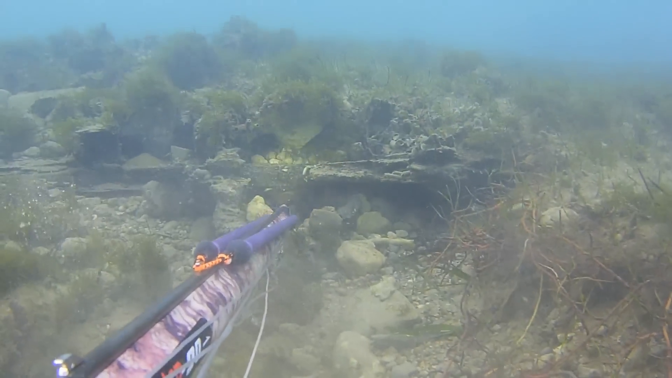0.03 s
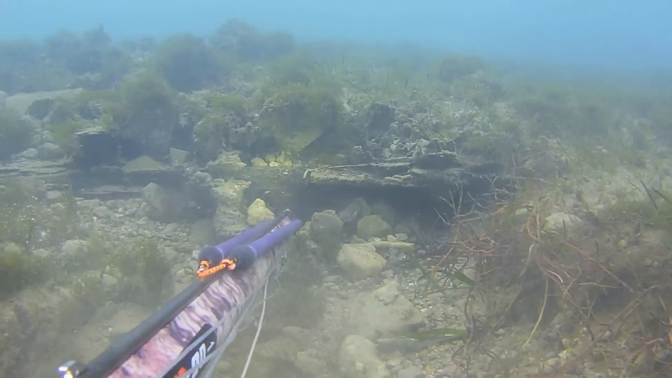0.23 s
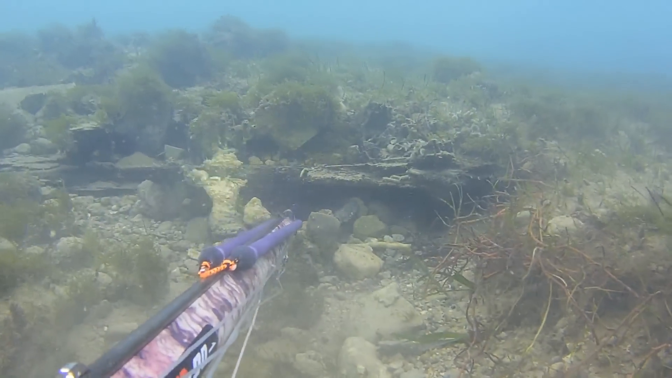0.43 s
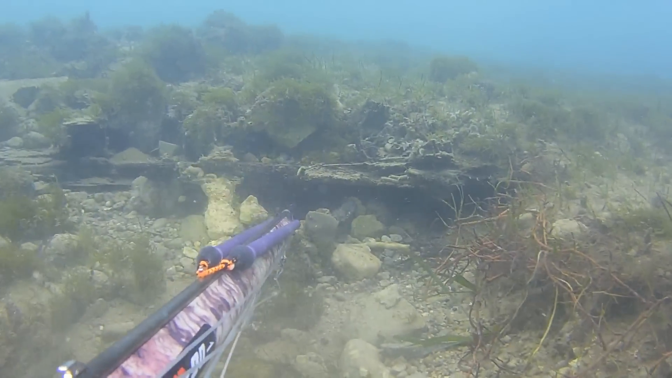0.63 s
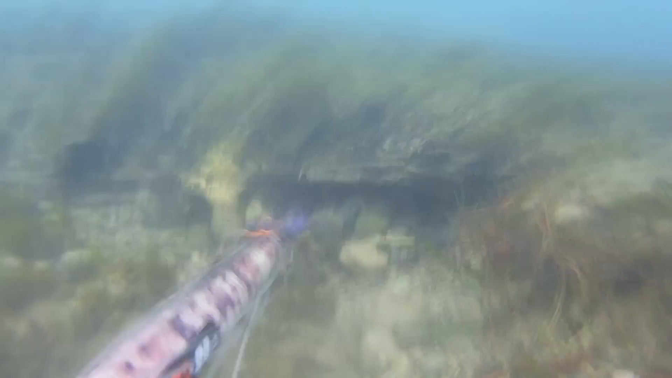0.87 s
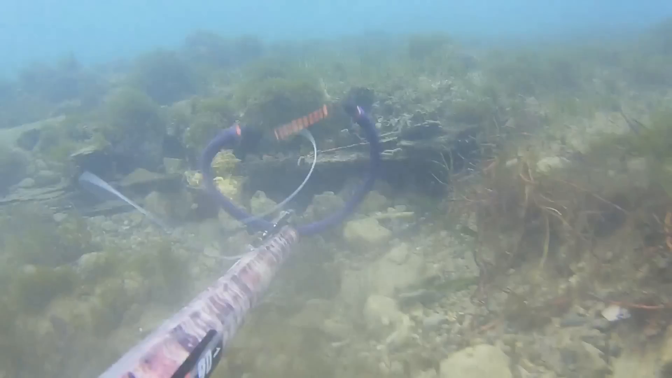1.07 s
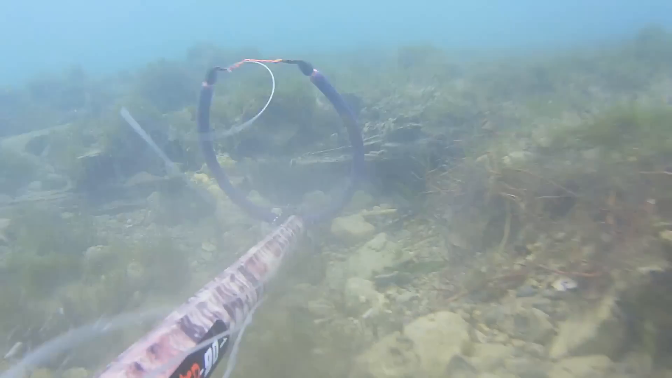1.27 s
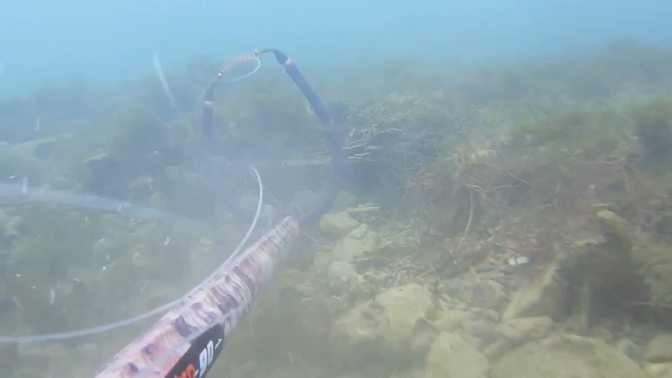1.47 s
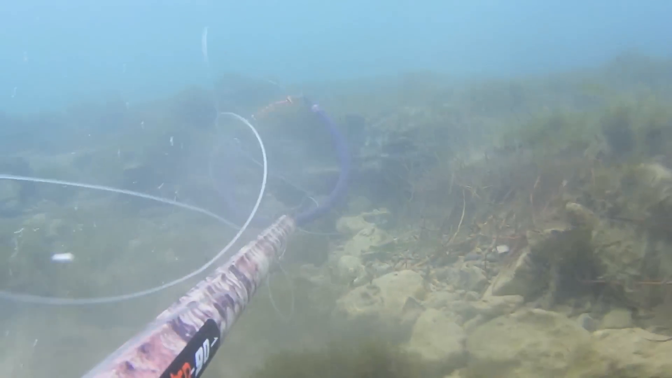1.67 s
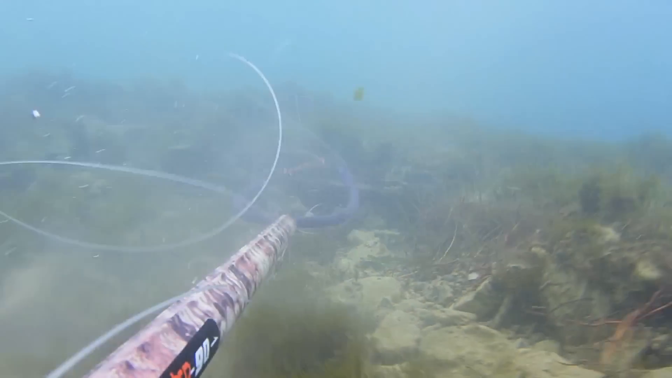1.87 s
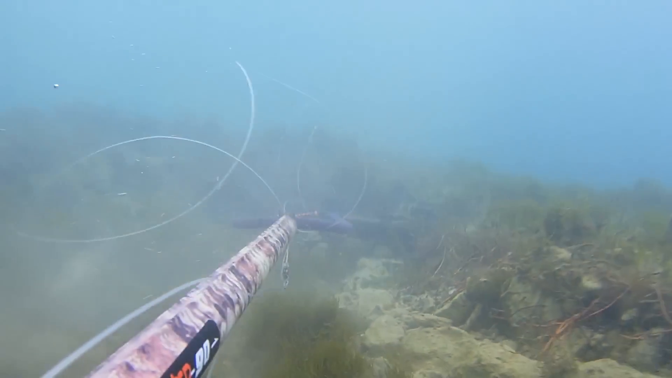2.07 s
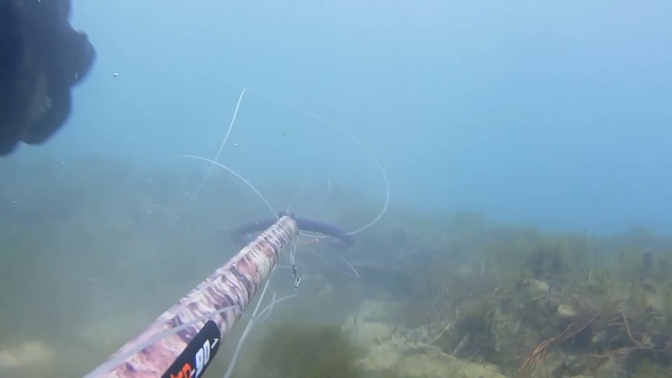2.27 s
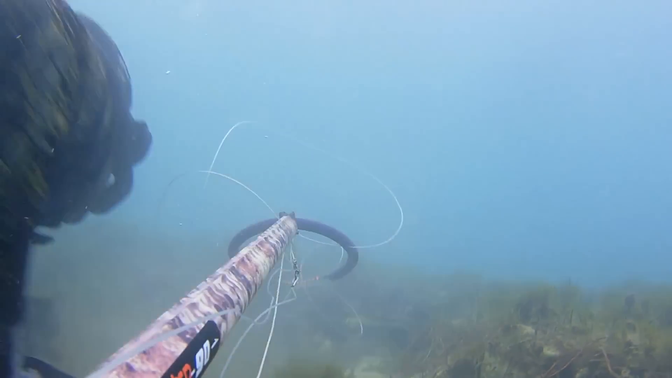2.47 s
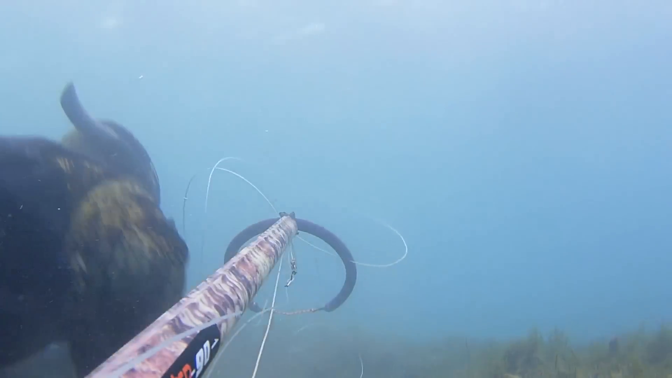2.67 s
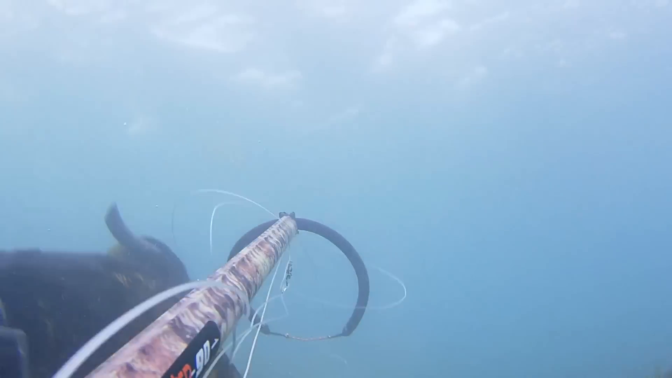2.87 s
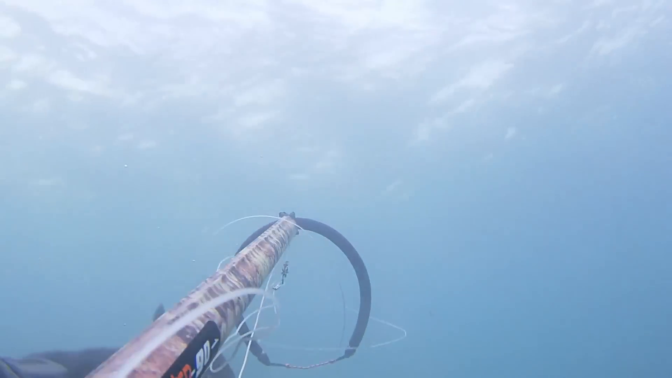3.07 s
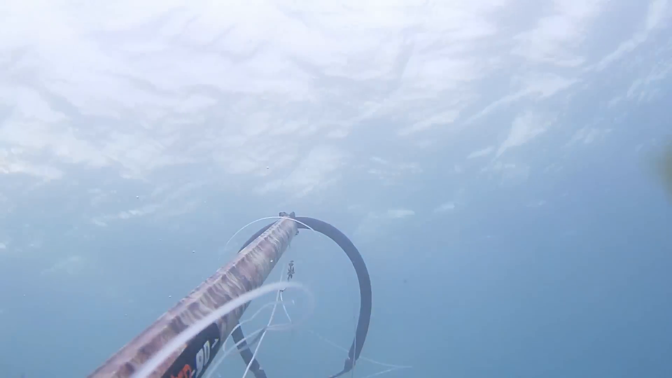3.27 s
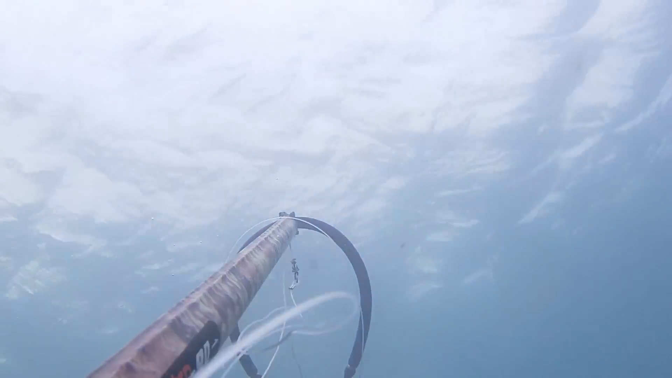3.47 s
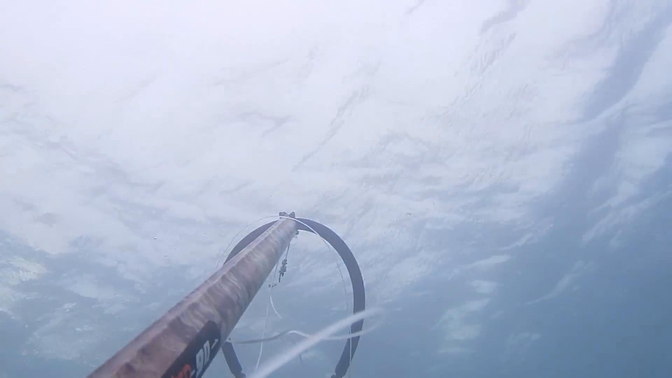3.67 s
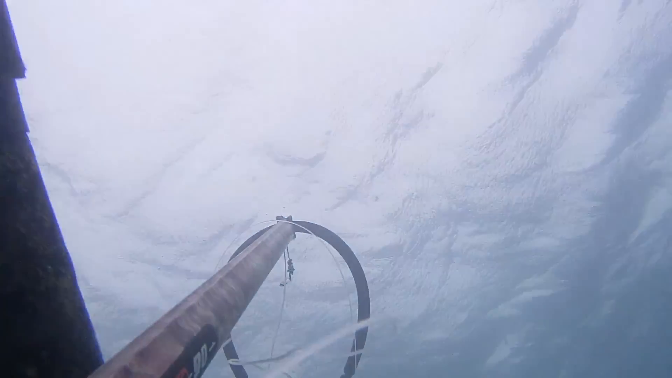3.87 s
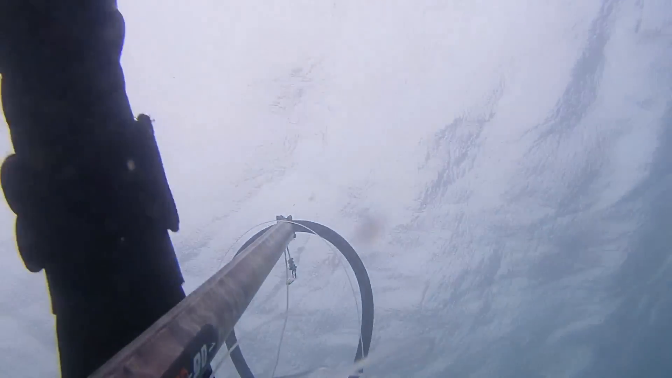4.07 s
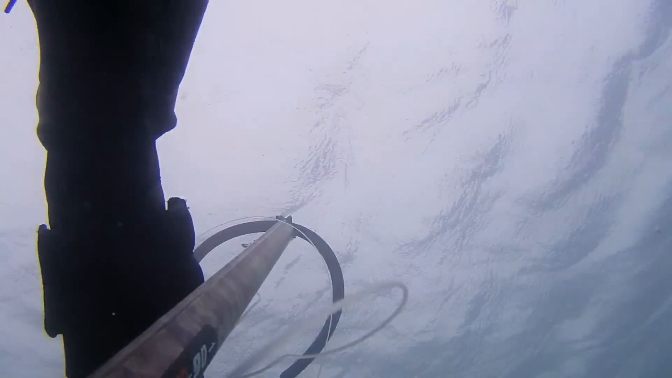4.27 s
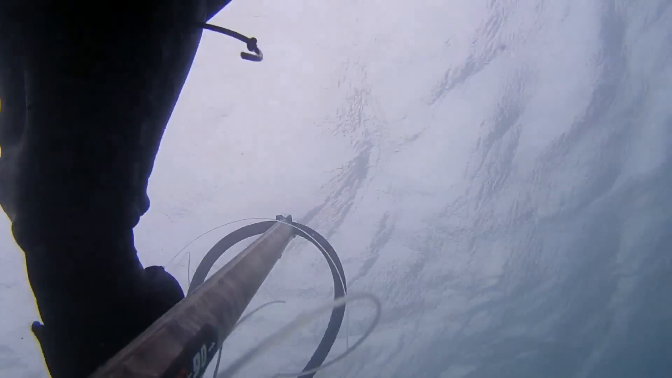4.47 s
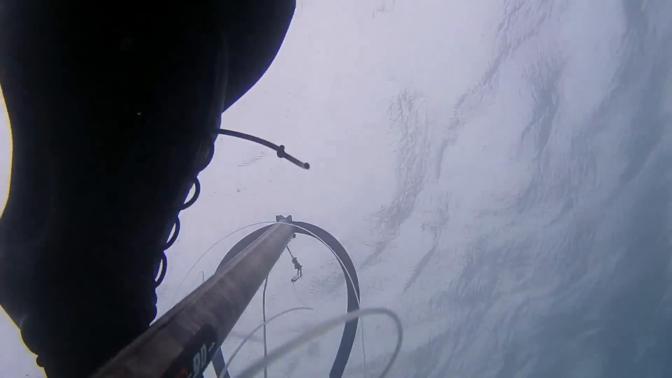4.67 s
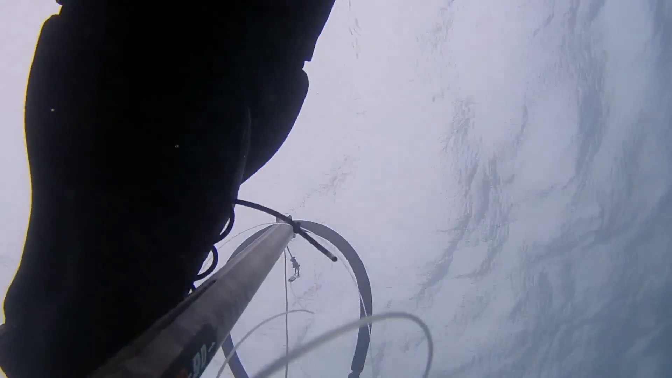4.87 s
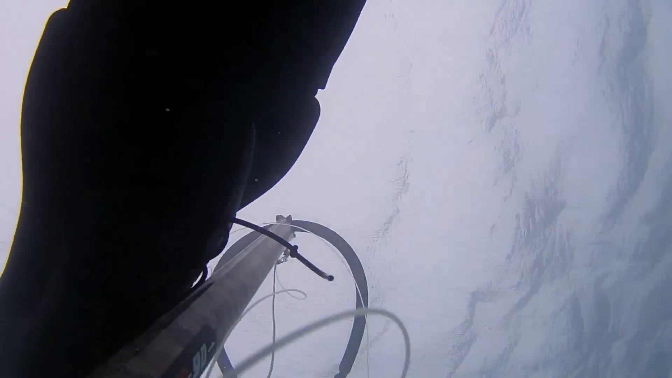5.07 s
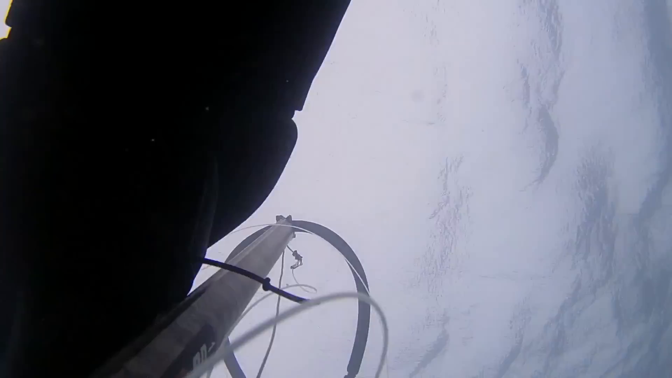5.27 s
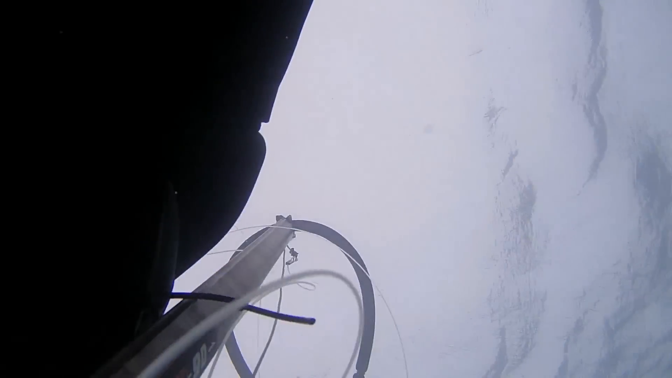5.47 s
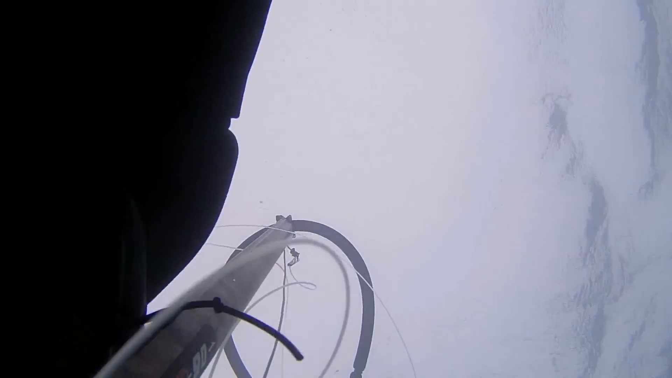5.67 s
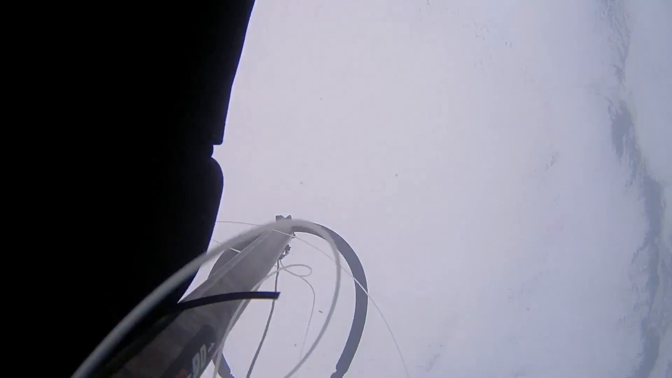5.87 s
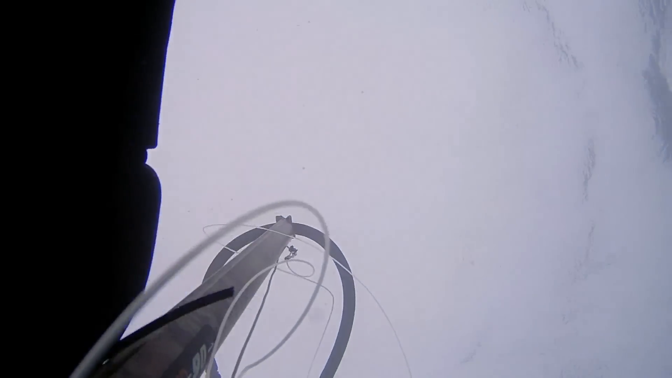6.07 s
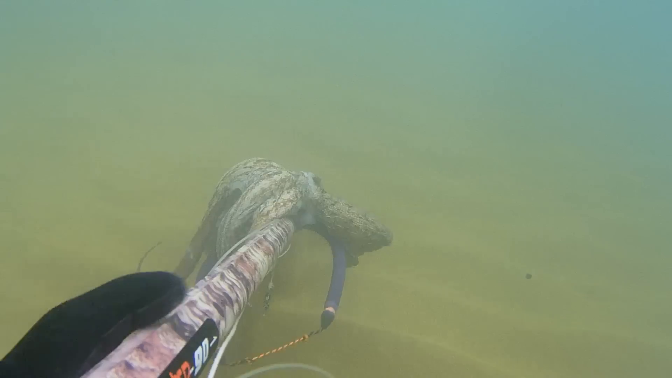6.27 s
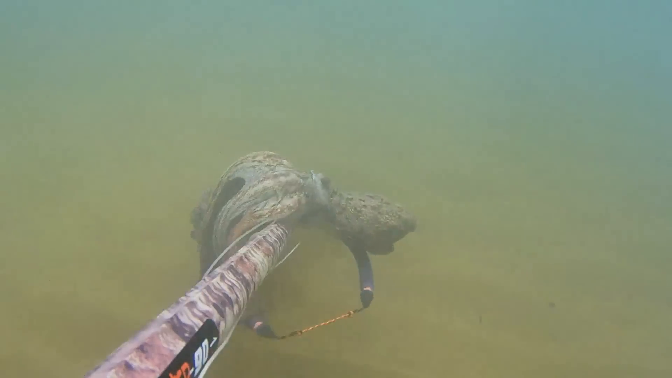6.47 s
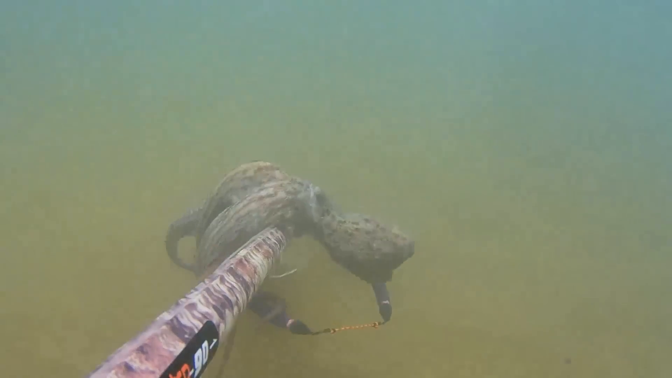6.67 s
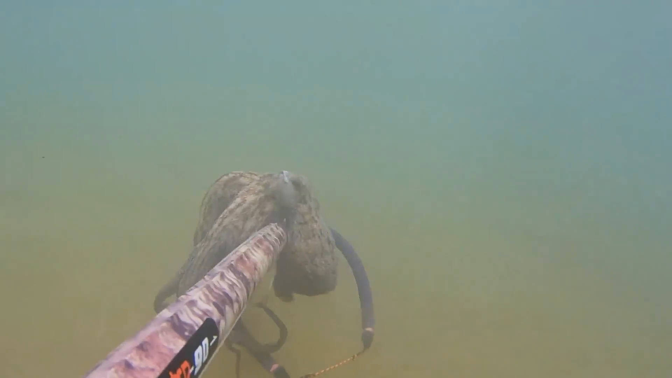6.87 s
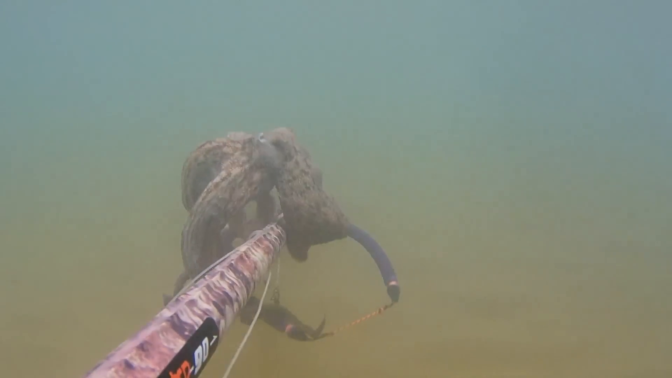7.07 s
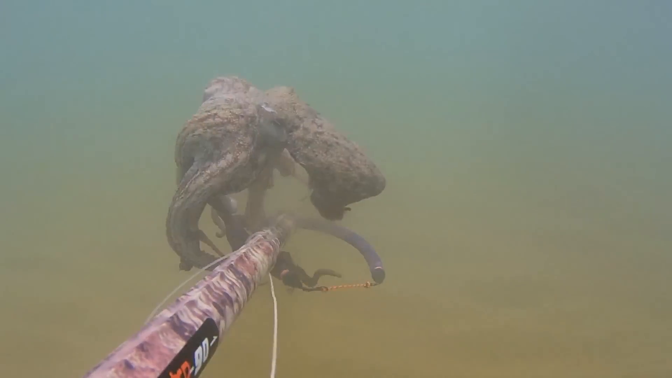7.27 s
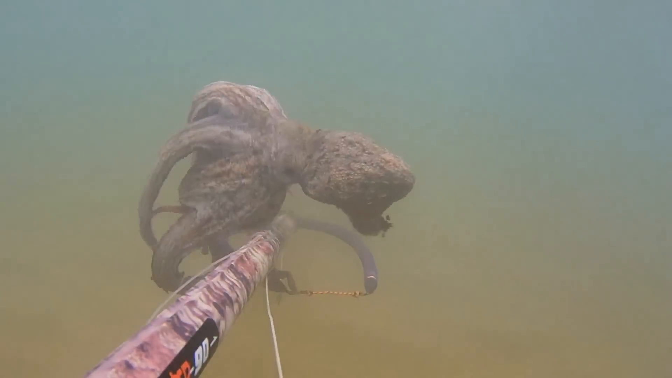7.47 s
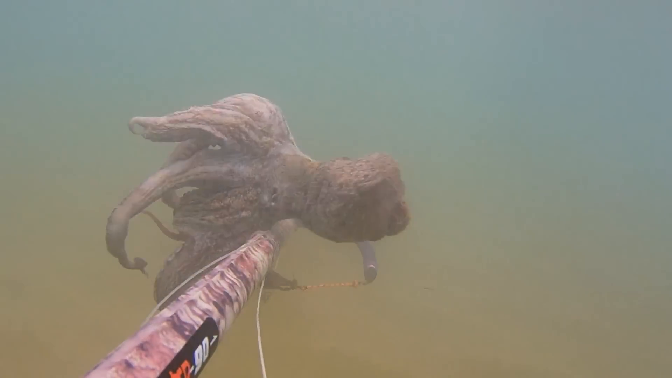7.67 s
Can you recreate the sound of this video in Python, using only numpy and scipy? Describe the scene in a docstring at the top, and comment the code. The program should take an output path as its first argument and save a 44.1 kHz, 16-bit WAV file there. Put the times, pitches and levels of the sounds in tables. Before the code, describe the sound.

Muffled shallow-water wash runs throughout, low and steady, with very faint sparse crackle, heard close through a camera housing on a speargun. At 0.2-0.3 s, faint snaps and a light rub. At 0.85 s the shot slams twice in quick succession, loud, hard and distorted, chattering along the rail until about 0.97 s with a short steel ring. Small knocks and line rubs follow, a firmer knock at 1.2 and a thin rising squeak around 1.3-1.4. Soft slaps at 1.6-1.8, rubbing fading by 2.7. A bouncing hollow knock at 3.75; a low boom at 4.15, a bubble ping at 4.29 and a strong knock at 4.32. Near quiet, then a resonant knock with booming at 5.8 and tiny bubbles. Sound drops out briefly at 6.25; soft rubs, a low thud at 6.44, a faint rubber groan at 6.85-7.05, and a last dull thump at 7.2.

```python
"""Under water, heard from a microphone in a camera housing fixed to a rubber-band speargun: first faint snaps and a rub.
Then the shot slams and chatters along the rail, overloading the input, and the shaft rings; the line squeaks out.
Slaps, knocks and rubs follow on the gun; like the slams they ring one bank of body modes, with damped notes added.
Later a few bubbles ping, the sound drops out for an instant, and a band groans at the end.
Behind it all lie the dull wash of shallow water, shaped noise, and a faint far crackle of random ticks."""
import sys
import numpy as np
from scipy import signal
from scipy.fft import rfft, irfft
from scipy.io import wavfile
from scipy.ndimage import uniform_filter1d

SR = 44100
rng = np.random.default_rng(int(sys.argv[2]) if len(sys.argv) > 2 else 0)


def bounce(signal):
    """Save signal as a 16-bit WAV file at the path given by the first command-line argument."""
    frames = np.transpose(np.atleast_2d(signal))
    limited = np.clip(frames, -1, 1)
    pcm = np.round(limited * 32767).astype(np.int16)
    wavfile.write(sys.argv[1], SR, pcm)


N = 340893  # samples in the scene


def from_db(db):
    """Decibels to amplitude gain."""
    return 10 ** (np.asarray(db) / 20)


def rms_one(x):
    """Scale to unit rms."""
    return x / np.sqrt(np.mean(x ** 2) + 1e-20)


def seconds(length_s):
    """A time axis from zero."""
    return np.arange(int(length_s * SR)) / SR


def add(out, start_s, sound):
    """Mix a sound in at a time, cut off at the end of the scene."""
    i = int(max(start_s, 0) * SR)
    out[i:i + len(sound)] += sound[:N - i]


def ring(force, hz, t60_s):
    """A two-pole resonator: a unit click sets a decaying sine of height about 1 ringing."""
    radius = from_db(-60 / (t60_s * SR))
    angle = 2 * np.pi * hz / SR
    # the tiny offset keeps the filter from running on vanishing numbers
    return signal.lfilter([0, np.sin(angle)], [1, -2 * radius * np.cos(angle), radius ** 2], force + 1e-18)


def asperities(size, per_s, spread_db):
    """Tiny random catches between two rough surfaces, of either sign and varied strength."""
    catches = rng.random(size) < per_s / SR
    strength = rng.standard_normal(size)
    return catches * strength * from_db(spread_db * rng.standard_normal(size))


# modes of barrel and housing: pitch_hz [Hz], level_db [dB, relative within a register], t60_s [s]
BODY_MODES = [(40.4, -5, 0.54), (60, -3, .25), (90, -4.5, .15), (130.4, 3, .11), (180, -2.5, .055),
              (200, -7, 0.03), (322.3, -1, 0.099), (396, -6.5, .025), (490.5, -12, 0.04),
              (543, -4.5, 0.033), (690, 5, .032), (689, -17, .22), (788, -2, .055), (1000, -8.5, 0.045),
              (1124, -8, .016), (1331.6, 2, 0.034), (1486.5, 3, 0.03), (1622, -2, 0.028), (1745, -4, 0.039),
              (2021, 3.5, 0.017), (2315, -1, 0.063), (2500, -3, 0.094), (2844, -8.5, .018),
              (3183, -9, 0.022), (3630, -4.5, 0.024), (4440, 0.5, 0.0051), (5270, -4.5, .012),
              (6000, -5, .014), (7700, -7, .005), (10400, -8, 0.0079), (13315, -17.5, .003)]
# bounds of the five registers, thump, hollow, ring, clack and tick: edge_hz [Hz]
REGISTER_EDGES_HZ = [25, 450, 1080, 1880, 3400, 15000]
MODE_SCATTER = .018  # pitch shift, standard deviation as a share of the pitch


def gun(force, register_db, span_s):
    """The body rings; the place of contact sets each register's level (rms, were it all spent within span_s)."""
    out = np.zeros(len(force))
    for low, high, level_db in zip(REGISTER_EDGES_HZ, REGISTER_EDGES_HZ[1:], register_db):
        band = signal.butter(2, [low, high], "band", fs=SR, output="sos")
        drive = signal.sosfilt(band, force + 1e-18)
        sound = 0
        for hz, mode_db, t60_s in BODY_MODES:
            if low < hz <= high:
                # the point of contact sets a mode's sign; grip and water load shift its pitch a little
                pitch_hz = hz * (1 + MODE_SCATTER * rng.standard_normal())
                sign = rng.choice([-1, 1])
                sound = sound + sign * from_db(mode_db) * rms_one(ring(drive, pitch_hz, t60_s))
        out += from_db(level_db) * rms_one(sound)
    return out * np.sqrt(span_s * SR / len(force))


def blows(rows, rattle_db, rattle_s):
    """Each blow is a quick crunch of contacts with a weaker, dying rattle."""
    out, t = np.zeros(N), seconds(.5)
    for start_s, contact_s, register_db in rows:
        crunch = t / contact_s * np.exp(1 - t / contact_s)
        rattle = from_db(rattle_db) * np.exp(-t / rattle_s)
        force = (crunch + rattle) * asperities(len(t), per_s=20000, spread_db=1.5)
        add(out, start_s, gun(force, register_db, span_s=.01))
    return out


def pings(table, swell_s):
    """Single damped sines that take a moment to swell."""
    out, t = np.zeros(N), seconds(.3)
    for start_s, pitch_hz, level_db, t60_s in table:
        decay = from_db(level_db - 60 * t / t60_s)
        swell = 1 - np.exp(-t / swell_s)
        add(out, start_s, decay * swell * np.sin(2 * np.pi * pitch_hz * t))
    return out


def squeak(curve, waver):
    """Stick-slip: a thin tone follows a curve; waver is its rms pitch unsteadiness as a share of the pitch."""
    point_s, pitch_hz, level_db = np.transpose(curve)
    t = np.arange(N) / SR
    unsteady = rms_one(uniform_filter1d(rng.standard_normal(N), size=60))
    pitch = np.interp(t, point_s, pitch_hz) * (1 + waver * unsteady)
    sounding = (t > point_s[0]) & (t < point_s[-1])
    tone = np.sin(2 * np.pi * np.cumsum(pitch) / SR)
    return sounding * from_db(np.interp(t, point_s, level_db)) * tone


# trigger release, band and shaft slam against the rail:
# start_s [s], level_db [dB], weight_db [dB, added to the thump], rebounds [count]
SHOT_SLAMS = [(0.851, 1.5, 4.5, 1), (0.8744, 5.5, -4, 4), (0.9219, -7, -1, 1), (0.936, -4, 1, 1)]
# how a slam feeds the registers: thump_db, hollow_db, ring_db, clack_db, tick_db [dB]
SHOT_COLOUR = [-13, -0.5, 1.5, -11.5, -23]
CHATTER_S, CHATTER_LOSS_DB, CHATTER_CONTACT_S = .0085, 5, .0017  # spacing, loss per touch, contact


def shot_slams():
    """After each slam the shaft chatters on the rail, weaker with every touch."""
    rows = []
    for start_s, level_db, weight_db, rebounds in SHOT_SLAMS:
        tilt_db = np.array([weight_db, 0, 0, 0, 0]) + SHOT_COLOUR
        for k in range(int(round(rebounds)) + 1):
            rows.append((start_s + k * CHATTER_S, CHATTER_CONTACT_S, level_db - k * CHATTER_LOSS_DB + tilt_db))
    return blows(rows, rattle_db=-48.5, rattle_s=0.005)


# notes of the freed steel shaft: start_s [s], pitch_hz [Hz], level_db [dB], t60_s [s]
SHAFT_NOTES = [(.915, 2930, -17, 0.18), (.925, 2422, -21, 0.16)]


def shaft_ring():
    """The freed steel shaft rings in damped tones."""
    return pings(SHAFT_NOTES, swell_s=0.0036)


# curve of the line's squeak: point_s [s], pitch_hz [Hz], level_db [dB]
LINE_SQUEAK = [(1.29, 2300, -70), (1.315, 2130, -56), (1.345, 2600, -63), (1.36, 2560, -50),
               (1.38, 3100, -58), (1.395, 3900, -64.5)]


def line_squeak():
    """The line sticks and slips as it runs out, squeaking at an unsteady pitch."""
    return squeak(LINE_SQUEAK, waver=0.035)


# knocks of hard gear on the gun, and a few faint sharp snaps and ticks: start_s [s], level_db [dB],
# weight_db [dB], hollowness_db [dB], hardness_db [dB], bounces [count]
KNOCKS_AND_SNAPS = [(.2184, -61, 4, -4, 20, 0), (0.3116, -67, 0, 0, 24.5, 0), (.827, -45.5, -7, -4, 1, 0),
                    (0.9533, -28, 4, -4, 4, 0), (0.9626, -23.5, -2.5, -1, -1, 0),
                    (0.9828, -24, -6, -7, -4, 0), (1.0144, -26.5, -19, -8.5, -1, 0),
                    (1.0215, -23.5, -5, -5, 5.5, 0), (1.0445, -36, -16, -6, 7, 0),
                    (1.078, -37.5, 3, -8, 3.5, 0), (1.2189, -16.5, -14, 0, -7.5, 0),
                    (1.262, -39.5, -13, -4.5, 7, 0), (2.7128, -40.5, -8, -4, -1.5, 0),
                    (3.7294, -33, 3.5, 1, 0.5, 0), (3.7715, -17.5, -5.5, -1.5, -2.5, 0),
                    (3.7778, -14, -4.5, 2, -2.5, 3), (4.1928, -35.5, -10, -6, 13.5, 0),
                    (4.3223, -12.5, 1.5, 2.5, 0.5, 2), (5.8236, -25.5, -8.5, 2.5, 4.5, 1),
                    (5.865, -42, -0.5, 2, 12, 0), (5.875, -32, -12.5, 1.5, 3, 0), (6.572, -61, 0, 4, 22, 0)]
# how a knock feeds the registers: thump_db, hollow_db, ring_db, clack_db, tick_db [dB]
KNOCK_COLOUR = [2, 0, -0.5, -15.5, -24]
KNOCK_CONTACT_S, BOUNCE_S, BOUNCE_LOSS_DB = .001, .0105, 6  # contact, spacing, loss per bounce
CLACK_HARDNESS = 0.97  # hardness lifts the tick in full, the clack by this share


def knocks_and_snaps():
    """Short contacts, some with bounces; hardness lifts the treble, the hollowness tilt fades with each touch."""
    rows = []
    for start_s, level_db, weight_db, hollow_db, hard_db, bounces in KNOCKS_AND_SNAPS:
        for k in range(int(round(bounces)) + 1):
            hollow = hollow_db / (k + 1)
            tilt_db = np.array([weight_db, hollow, -hollow, CLACK_HARDNESS * hard_db, hard_db])
            register_db = level_db - k * BOUNCE_LOSS_DB + tilt_db + KNOCK_COLOUR
            rows.append((start_s + k * BOUNCE_S, KNOCK_CONTACT_S, register_db))
    return blows(rows, rattle_db=-24.5, rattle_s=0.016)


# soft slaps of band, line and glove: start_s [s], contact_s [s], level_db [dB], weight_db [dB]
SOFT_SLAPS = [(1.234, 0.0054, -35.5, -0.5), (1.589, .0026, -21, 0.5), (1.6595, 0.002, -19.5, 1.5),
              (1.698, 0.002, -26, 2), (1.769, 0.0019, -33.5, -14), (1.949, 0.0014, -42.5, 3),
              (1.9865, 0.0026, -43, 1), (2.772, 0.0033, -41, -1.5), (4.151, 0.0039, -44, 13),
              (4.383, .006, -46, 4.5), (5.8105, 0.0034, -38.5, 3), (6.434, 0.0071, -43, 8),
              (7.214, 0.0031, -53.5, 10), (7.244, 0.0023, -65.5, 19.5)]
# how a slap feeds the registers: thump_db, hollow_db, ring_db, clack_db, tick_db [dB]
SLAP_COLOUR = [-0.5, 0.5, .5, -14.5, -40.5]


def soft_slaps():
    """Soft things land once, with little treble; their weight goes into the thump."""
    rows = []
    for start_s, contact_s, level_db, weight_db in SOFT_SLAPS:
        register_db = level_db + np.array([weight_db, 0, 0, 0, 0]) + SLAP_COLOUR
        rows.append((start_s, contact_s, register_db))
    return blows(rows, rattle_db=-21, rattle_s=0.03)


# how a rub feeds the registers: thump_db, hollow_db, ring_db, clack_db, tick_db [dB]
RUB_COLOUR = [-0.5, -0.5, 0, -12.5, -22.5]
GRIP_CLACK, GRIP_TICK = 1, 1.3  # shares of the grip that clack and tick gain


def rub_colour(level_db, weight_db, grip_db):
    """A loose line lets the barrel ring; a firm glove damps the ring and sounds broad and hollow."""
    tilt_db = np.array([weight_db, grip_db, -grip_db, GRIP_CLACK * grip_db, GRIP_TICK * grip_db])
    return level_db + tilt_db + RUB_COLOUR


# line and glove on the barrel: start_s [s], end_s [s], fade_db [dB over the stroke], level_db [dB],
# weight_db [dB], grip_db [dB]
RUB_STROKES = [(0.174, 0.249, -10.5, -51.5, -4, 4.5), (.829, 0.847, -14, -39, -12, -1),
               (1.029, 1.115, 22, -41, -1, 1), (1.11, 1.209, -2, -46.5, -9, -0.5),
               (1.242, 1.392, 4, -59.5, 10, -1), (1.631, 1.67, 4, -41, 1, 0.5),
               (1.701, 1.90, 6.5, -40, -3, -0.5), (1.901, 1.98, -5, -47.5, -4, 0),
               (1.985, 2.043, 17, -37.5, 1, -1.5), (2.049, 2.185, -2, -64, 8, -5),
               (2.2, 2.412, 1, -56, -7.5, -4.5), (2.465, 2.702, 2, -56, -10, -1),
               (2.99, 3.054, 5.5, -46, -11, -4), (3.728, 3.803, 6, -34, -6, -2),
               (4.159, 4.214, 3, -43.5, 1, 1), (6.245, 6.4, 3, -46.5, -1.5, 0),
               (6.402, 6.698, 16, -56.5, 0, 1.5), (6.822, 7.01, 12, -53, -3.5, 3.5)]


def rubbing(edge_s, judder_points_per_s, judder_db):
    """Dense catches under each stroke, swelling and easing as the surfaces stick and slip."""
    out = np.zeros(N)
    for start_s, end_s, fade_db, level_db, weight_db, grip_db in RUB_STROKES:
        length_s = max(end_s - start_s, edge_s)
        t = seconds(length_s + .2)  # room for the body to ring on
        onset = np.clip(t / edge_s, 0, 1)
        release = np.clip((length_s - t) / edge_s + 1, 0, 1)
        press = onset * release * from_db(-fade_db * t / length_s)
        judder = np.interp(t * judder_points_per_s, np.arange(200), rng.standard_normal(size=200))
        force = press * from_db(judder_db * judder) * asperities(len(t), per_s=3600, spread_db=3.5)
        add(out, start_s, gun(force, rub_colour(level_db, weight_db, grip_db), span_s=length_s))
    return out


# damped notes that ring on after some knocks: start_s [s], pitch_hz [Hz], level_db [dB], t60_s [s]
KNOCK_NOTES = [(1.024, 330, -24.5, 0.17), (1.2215, 330, -23.5, 0.078), (4.326, 720, -32.5, .33),
               (5.8238, 784, -12.5, 0.082), (5.8238, 1986, -23, 0.064), (5.8762, 820, -11, 0.019)]


def knock_notes():
    """Damped sines that ring on after some knocks."""
    return pings(KNOCK_NOTES, swell_s=0.0016)


# low booms under some knocks and slaps: start_s [s], pitch_hz [Hz], level_db [dB], t60_s [s]
LOW_BOOMS = [(2.0, 45, -47, .4), (4.156, 70.7, -24.5, 0.22), (4.345, 50, -38, 0.54),
             (5.812, 54.7, -25, 0.31), (6.442, 47.3, -20, 0.12), (7.243, 45, -34.5, 0.12)]


def low_booms():
    """Low booms under some knocks and slaps: damped tones."""
    return pings(LOW_BOOMS, swell_s=0.0043)


# curve of the dragged rubber band: point_s [s], pitch_hz [Hz], level_db [dB]
BAND_GROAN = [(6.80, 714, -71), (6.86, 710, -42.5), (6.92, 705, -58), (6.96, 704, -39.5), (7.0, 690, -56.5),
              (7.05, 704, -52)]


def band_groan():
    """The rubber band sticks and slips as it is dragged, groaning at an unsteady pitch."""
    return squeak(BAND_GROAN, waver=0.0567)


# bubbles ringing: start_s [s], pitch_hz [Hz], level_db [dB], t60_s [s]
BUBBLE_NOTES = [(4.2875, 1460, -19, 0.059), (5.165, 1497, -37.5, 0.031), (5.891, 3210, -30, 0.021),
                (5.901, 2780, -37, .02), (6.572, 2250, -41, 0.018), (6.598, 2390, -41, 0.027)]


def bubbles():
    """Each bubble rings as one damped sine."""
    return pings(BUBBLE_NOTES, swell_s=0.0026)


# spectrum of the wash: frequency_hz [Hz], density_db [dB per Hz, relative]
SEA_SPECTRUM = [(19, -30), (32, 3.5), (114, -2), (164, -1.5), (212, -3), (297, -2.5), (438, -4),
                (473, -4.5), (552, -7), (645, -5.5), (735, -9), (1560, -15.5), (2020, -19.5), (2550, -22),
                (15600, -40)]
SEA_DB = -51  # rms level


def sea():
    """The steady dull wash of shallow water: noise shaped along a log-frequency curve."""
    hz, density_db = np.transpose(SEA_SPECTRUM)
    bins_hz = np.maximum(np.arange(N // 2 + 1) * SR / N, 1)
    colour = from_db(np.interp(np.log(bins_hz), np.log(hz), density_db))
    wash = irfft(rfft(rng.standard_normal(N)) * colour, N)
    return from_db(SEA_DB) * rms_one(wash)


def crackle(per_s, gain_db):
    """Far snapping shrimp: random clicks tick the highest modes of the housing."""
    snaps = (rng.random(N) < per_s / SR) * rng.uniform(0.18, 1, N)
    ticks = np.zeros(N)
    for hz, mode_db, t60_s in BODY_MODES:
        if hz > REGISTER_EDGES_HZ[-2]:
            ticks += from_db(mode_db) * ring(snaps, hz, t60_s)
    return from_db(gain_db) * ticks


def scene():
    """All sources meet at the one microphone in the housing."""
    shot = shot_slams() + shaft_ring() + line_squeak()
    handling = knocks_and_snaps() + soft_slaps()
    handling += rubbing(edge_s=0.0045, judder_points_per_s=160.7, judder_db=3.0)
    handling += knock_notes() + low_booms() + band_groan()
    water = bubbles() + sea() + crackle(per_s=3.6, gain_db=-59.0)
    return (shot + handling + water)[None]


# the instant when the sound drops out: start_s [s], end_s [s]
DROPOUT_SPAN = (6.2425, 6.2525)
OVERLOAD = .48  # amplitude where the input flattens, full scale 1
CUTOFF_HZ = 15900


def record(dry):
    """The input overloads with flat tops, the sound drops out for an instant, and the top is cut."""
    clipped = np.clip(dry, -OVERLOAD, OVERLOAD)
    t = np.arange(N) / SR
    dropped = (t > DROPOUT_SPAN[0]) & (t < DROPOUT_SPAN[1])
    clipped = clipped * np.where(dropped, .03, 1)
    lowpass = signal.firwin(201, CUTOFF_HZ, fs=SR)
    return signal.fftconvolve(clipped, lowpass[None], mode="same")


dry = scene()
out = record(dry)
bounce(out)
```